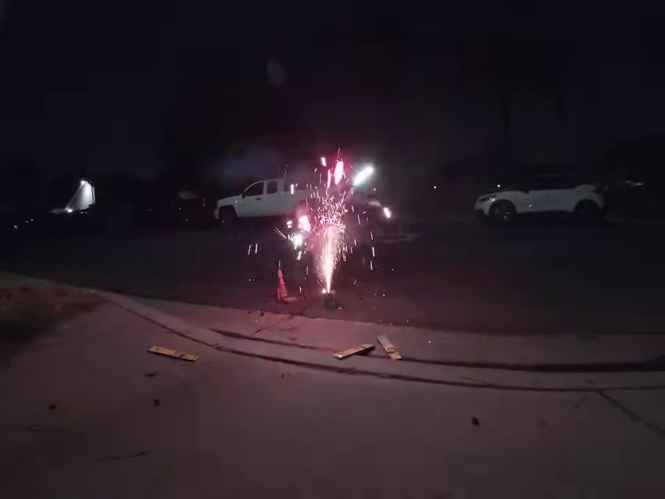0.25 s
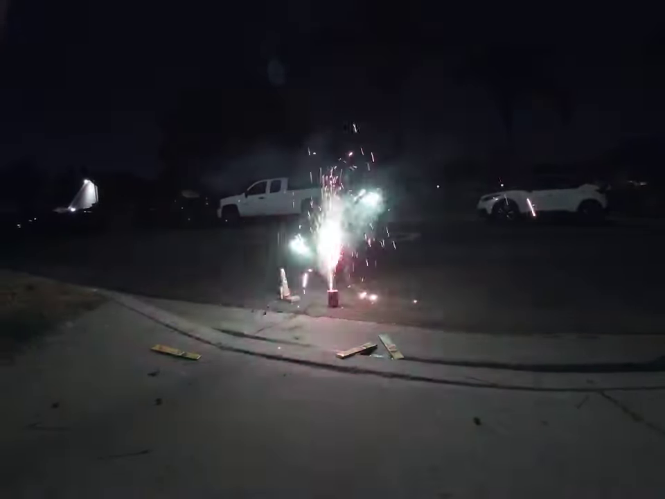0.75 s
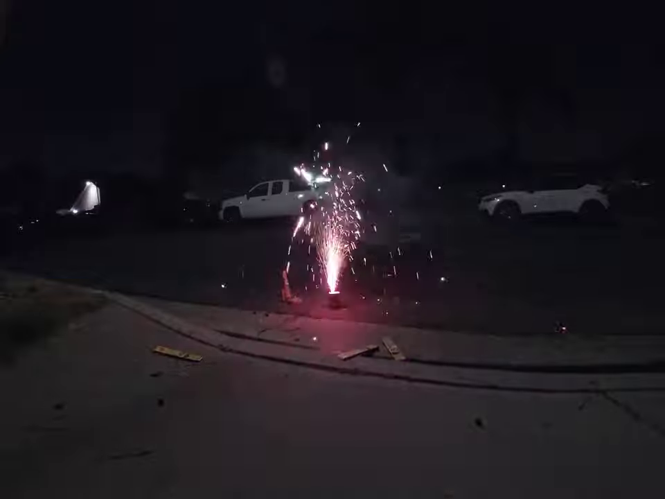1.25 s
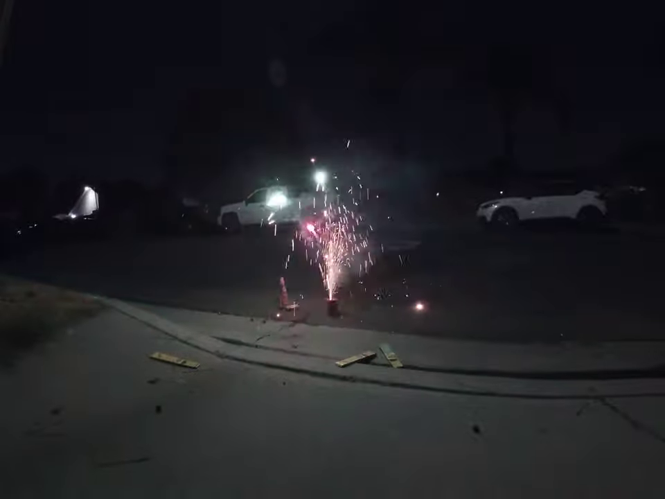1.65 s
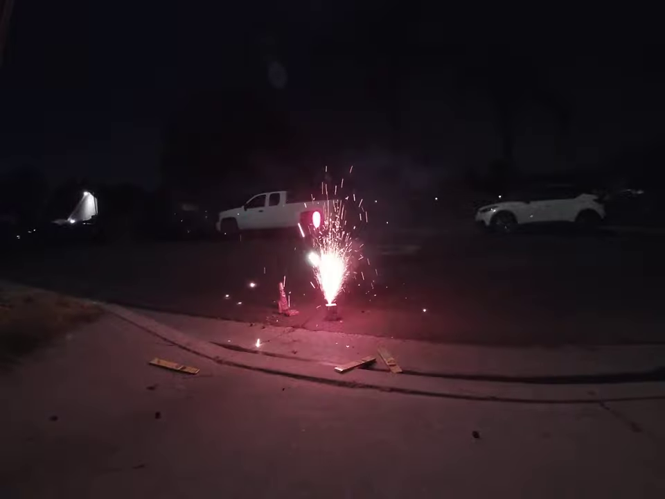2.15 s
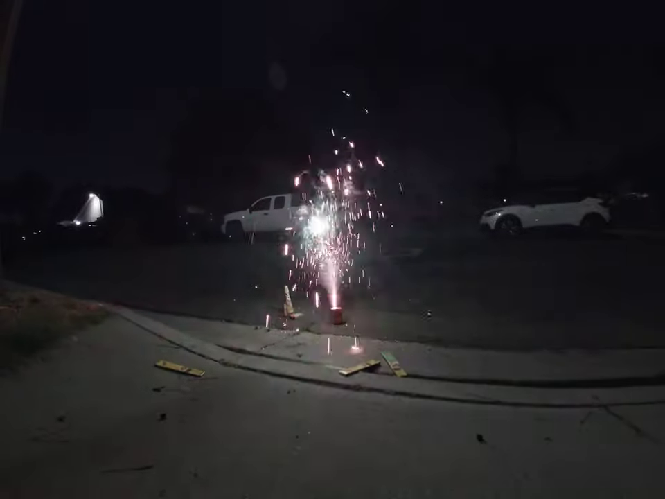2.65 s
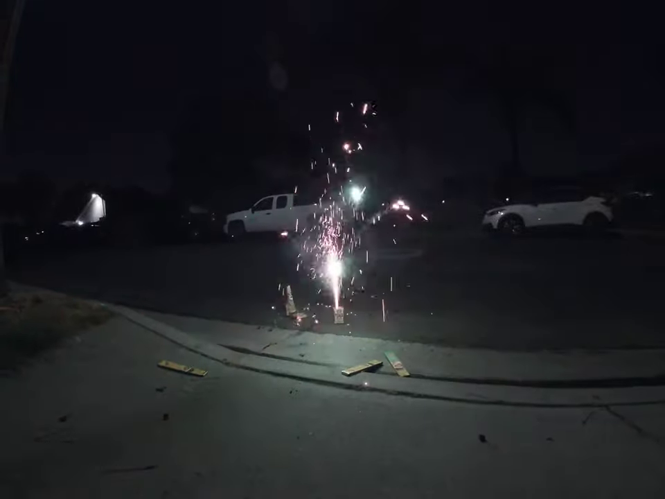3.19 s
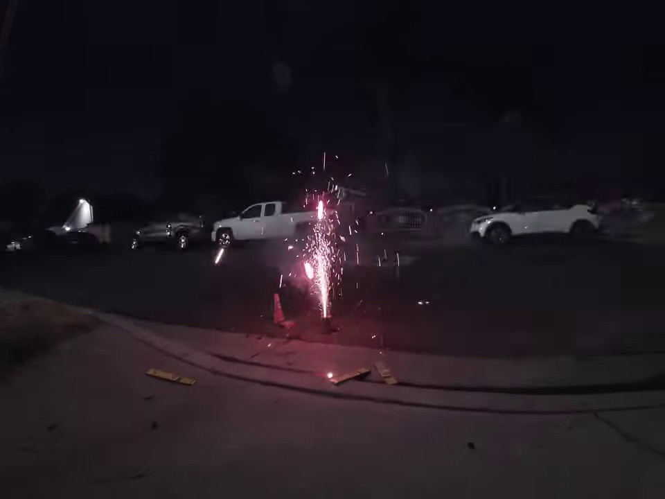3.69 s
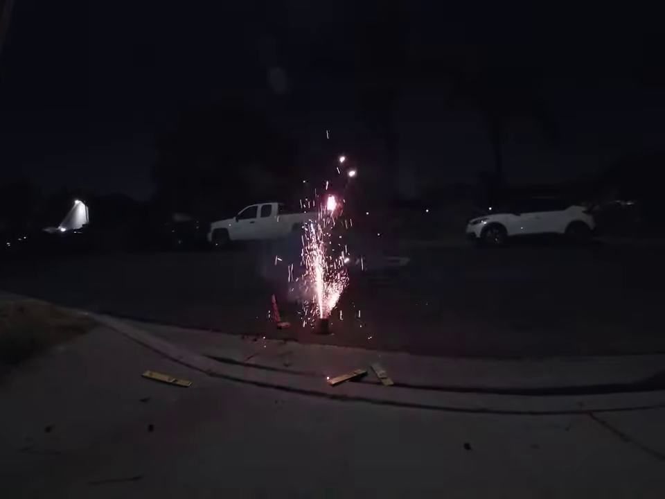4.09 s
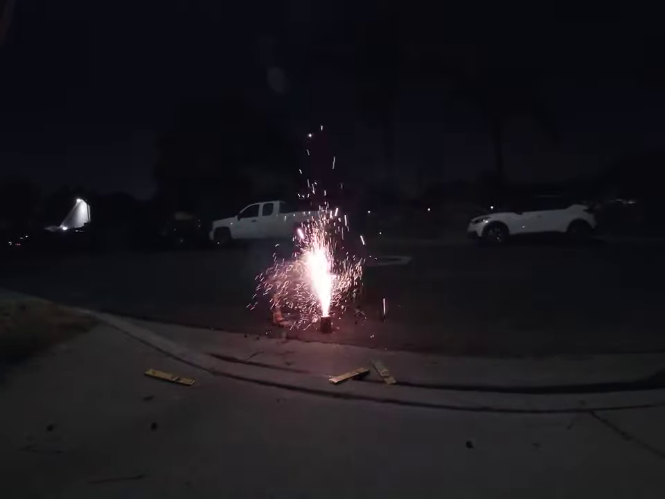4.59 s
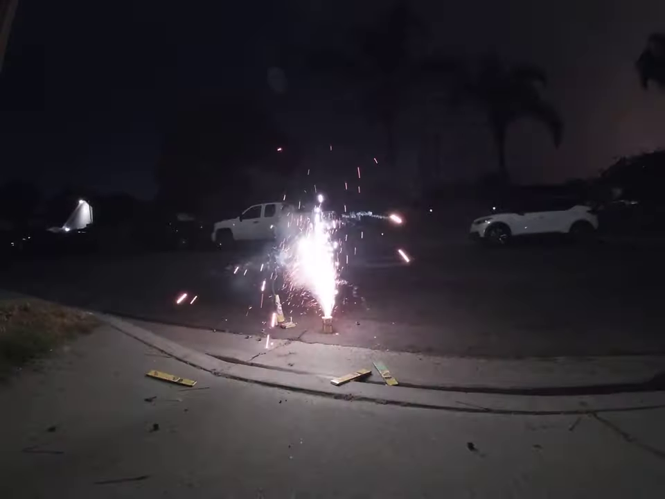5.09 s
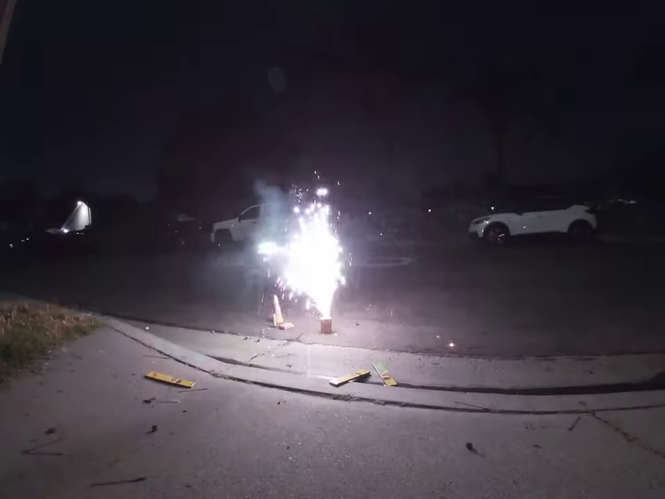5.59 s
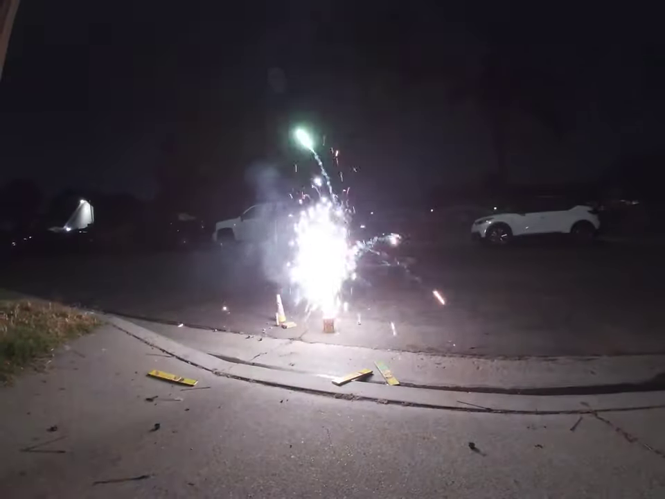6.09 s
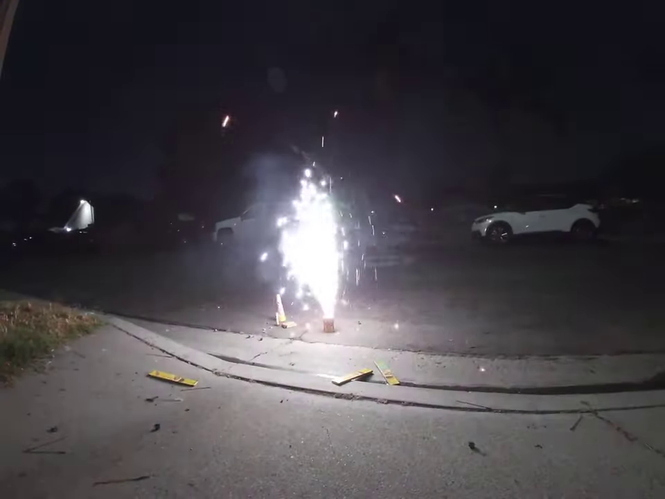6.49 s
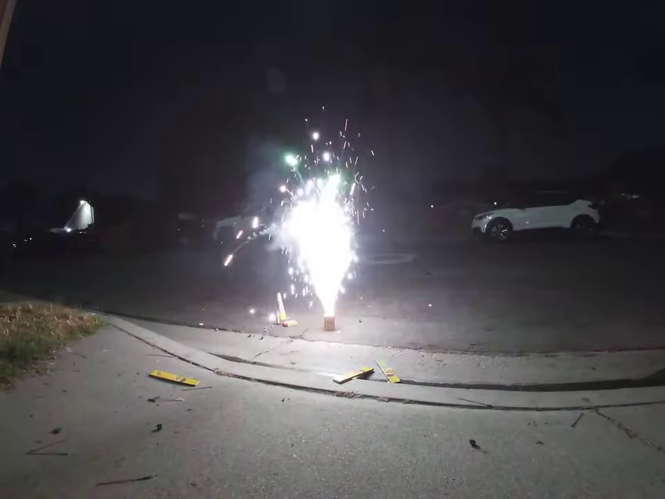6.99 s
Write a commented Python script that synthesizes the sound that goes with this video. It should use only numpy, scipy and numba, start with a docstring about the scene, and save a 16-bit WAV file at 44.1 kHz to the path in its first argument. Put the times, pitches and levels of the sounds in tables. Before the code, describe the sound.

Outdoors on a night street, a small ground fountain hisses and fizzes quietly throughout, sputtering unevenly and brightest near 3 seconds. Over it, firework bursts dominate from the start: dull low thumps in irregular clusters, with sharper cracks around 0.3, 1.6 and 2 seconds, blurred into lumpy rumble and mid-range wash off houses. Activity thins around 2.5 to 2.9, resumes with thumps at 3 to 3.5, then cracks bunch up from 4.2. At 4.6 a very close, hard bang sets the street booming, with slaps and rolling echoes. Bursts ease by 5, and a grainy shower of tiny pops swells at 5.3, fading before 6. Near 6.16 the loudest bang strikes, followed by rapid thuds and cracks until 6.4. Scattered thumps continue as another crackling shower fills in around 7 and lasts nearly to the end. Single microphone, slightly dulled treble, rounded peaks, brief ducking after bangs.

```python
"""Night street: shell bursts and the hiss of a ground fountain are present from the outset.
Far bursts radiate dull low thumps, nearer ones add a crack with scatter; houses return rumble and wash.
Near 4.6 s a very close burst sets the street booming; near 5.3 s filtered random pops form a star shower.
Near 6.2 s another close burst follows, and near 7 s a second shower; the fountain is filtered noise."""
import sys
import numpy as np
from scipy import signal
from scipy.fft import rfft, irfft
from scipy.io import wavfile
from scipy.ndimage import uniform_filter1d
from numba import njit

SR = 44100
rng = np.random.default_rng(int(sys.argv[2]) if len(sys.argv) > 2 else 0)


def materialize(psi):
    """Save the field psi as 16-bit PCM at rate SR to the path in sys.argv[1].

    A 1-D psi becomes a single channel; in a 2-D psi each row is a channel.
    """
    bounded = np.clip(np.atleast_2d(psi).T, -1, 1)
    quanta = np.round(bounded * 32767).astype(np.int16)
    wavfile.write(sys.argv[1], SR, quanta)


N = 319725
TIME = np.arange(N) / SR  # s

# Low pressure pulses of the bursts: t/s of the trough, trough level/dB, f/Hz at the trough
THUMPS = [(0.015, -13, 139), (0.087, -7.5, 254), (0.271, -6, 198), (0.285, -9, 148), (0.315, -8, 228),
          (0.355, -14, 170), (0.415, -5, 240), (0.498, -15.5, 214), (0.791, -3.5, 237), (0.848, -8.5, 223),
          (0.878, -12.5, 252), (1.094, -10, 149), (1.186, -4, 262), (1.24, -8, 222), (1.315, -7, 273),
          (1.497, -9.5, 198), (1.608, -3, 223), (1.682, -13, 210), (1.73, -6.5, 239), (1.747, -15, 200),
          (1.774, -8, 138), (1.946, -2.5, 236), (1.981, -3.5, 157), (2.054, -10, 235), (2.071, -4.5, 230),
          (2.087, -13, 200), (2.254, -14, 123), (2.269, -10, 255), (2.452, -8.5, 156), (2.961, -10.5, 249),
          (3.008, -7, 190), (3.046, -9.5, 224), (3.093, -9.5, 200), (3.124, -7.5, 198), (3.148, -28, 127),
          (3.233, -2, 226), (3.31, -8.5, 247), (3.356, -5.5, 228), (3.383, -9, 173), (3.49, -9.5, 195),
          (3.556, -12, 227), (3.975, -11, 203), (4.013, -10, 163), (4.124, -5.5, 159), (4.152, -8, 193),
          (4.229, -1.5, 230), (4.259, -8.5, 197), (4.288, -3.5, 197), (4.355, -5.5, 244),
          (4.406, -6.5, 184), (4.5, -5, 219), (4.6054, 1.5, 172), (4.6488, -1.5, 205), (4.683, -4, 183),
          (4.712, -18, 162), (4.727, -8, 190), (4.741, -15, 196), (4.762, -15, 201), (4.782, -24, 149),
          (4.819, -10, 151), (5.486, -11, 153), (5.71, -6.5, 191), (6.1625, 0.5, 192), (6.221, -8, 252),
          (6.253, -6, 240), (6.265, -11, 166), (6.278, -10, 215), (6.3, -4.5, 294), (6.322, -8.5, 227),
          (6.341, -6, 208), (6.358, -5.5, 190), (6.371, -8.5, 227), (6.386, -14, 170), (6.413, -12, 213),
          (6.651, -10, 89), (6.782, -5, 200), (6.883, -5.5, 202), (6.927, -9, 248), (7.051, -9, 169),
          (7.164, -3, 198), (7.234, -10.5, 151)]
# Sharp fronts of nearer bursts and their wall slaps: onset t/s, body level/dB, body f/Hz,
# edge level/dB relative to the body
CRACKS = [(0.082, -20, 640, -15), (0.267, -17, 590, -18), (0.289, -26, 950, -12), (0.3102, -8, 860, -11.5),
          (0.334, -42, 700, -12), (0.373, -41, 696, -7), (0.651, -33, 870, -7), (1.237, -29, 650, -12),
          (1.511, -28, 703, -9), (1.602, -15, 865, -12), (1.638, -14, 1060, -14), (1.65, -19, 970, -12),
          (1.677, -21, 980, -17), (1.723, -32, 710, -11), (1.94, -15.5, 706, -19), (1.976, -12, 680, -13),
          (1.999, -26, 616, -17), (2.012, -29, 686, -5), (2.028, -40, 620, -11), (2.153, -56, 1430, -15),
          (2.248, -40, 715, -9), (2.266, -17, 570, -26), (2.308, -39, 1560, -11), (2.457, -24, 1350, -19),
          (2.587, -40, 786, 8), (3.227, -23.5, 993, -6), (3.264, -15, 1450, -16), (3.298, -31, 714, -6),
          (3.782, -30, 1100, -14), (3.823, -43, 703, -2), (3.869, -38, 727, -10), (3.963, -17, 820, -18),
          (4.022, -18, 1640, -27), (4.222, -14, 840, -13), (4.261, -12, 1170, -28), (4.28, -8.5, 700, -17),
          (4.297, -24, 703, -15), (4.309, -17, 790, -16), (4.33, -23, 750, -15), (4.382, -35, 800, 0),
          (4.423, -22, 910, -20), (4.5993, -0.5, 600, -1), (4.6168, -24, 1500, -6), (4.642, -9, 570, -15),
          (4.677, -32, 800, -17), (4.709, -36, 596, -14), (4.803, -40, 1010, -3), (4.824, -50, 1650, -3),
          (5.873, -54, 900, -2), (6.1568, 3, 720, -10), (6.215, -20, 800, -12), (6.226, -40, 980, -9),
          (6.248, -11, 1030, -14), (6.292, -18.5, 890, -13), (6.3, -19.5, 895, -11), (6.338, -32, 547, -13),
          (6.353, -35, 550, -12), (6.413, -45, 524, -24), (6.876, -19, 705, -13), (7.049, -38, 982, -5)]
# Steady part of the blurred far bursts: t/s, rumble level/dB, house wash level/dB
FAR_BURSTS = [(0.0, -22, -31), (0.3, -23.5, -32.5), (0.6, -24.5, -32.5), (1.07, -23, -31),
              (1.35, -22, -28.5), (1.8, -23.5, -33), (2.2, -22, -36), (2.45, -25.5, -32), (2.7, -23.5, -31),
              (2.9, -22.5, -26.5), (3.4, -20, -29.5), (3.85, -25.5, -32), (4.1, -24.5, -28.5),
              (4.55, -22, -32), (4.72, -23, -26.5), (4.9, -22, -39), (5.25, -28.5, -61), (5.5, -24, -39.5),
              (5.95, -21.5, -32), (6.19, -24.5, -30), (6.36, -40, -27), (6.5, -24.5, -34.5),
              (6.7, -22, -35), (7, -29, -28.5), (7.25, -41, -28)]
# Spectrum of the rumble: f/Hz, relative gain/dB
RUMBLE_COLOUR = [(35, -20.5), (60, -1.5), (110, 3.5), (200, 0.5), (280, -5), (360, -18.5), (600, -58),
                 (4000, -120)]
# Spectrum of the wash off the houses: f/Hz, relative gain/dB
WASH_COLOUR = [(250, 5.5), (380, -1.5), (470, -1), (560, 0.5), (650, 0), (760, 0), (900, -2.5), (1200, -13),
               (2500, -46.5), (9000, -110)]
# Spectrum of the brighter wash: f/Hz, relative gain/dB
BRIGHT_COLOUR = [(500, -9), (900, 9), (1300, 1), (2000, -5.5), (3000, -9.5), (6000, -46.5), (12000, -81)]
# Bright sizzle that swells now and then: t/s at the top, level/dB, rise/(dB/s)
GLARE = [(4.27, -49, 81), (4.63, -46.5, 200), (4.74, -52, 77), (6.09, -49.5, 17), (6.24, -52, 210),
         (6.33, -48.5, 80)]
# Spectrum of the sizzle: f/Hz, relative gain/dB
GLARE_COLOUR = [(1500, -15), (3500, -6), (4800, 3), (6000, 3.5), (7000, -0.5), (8200, -5), (9500, -8),
                (11000, -9.5), (12500, -33), (15500, -63)]
# Spectrum of the street boom: f/Hz, relative gain/dB
STREET_COLOUR = [(200, -18), (330, -3), (480, 0), (620, -4), (800, -14), (1500, -40), (6000, -90)]
# Burning jet of the fountain: t/s, level/dB before its level-dependent brightening
JET = [(0.0, -39.5), (0.1, -42), (0.2, -37.5), (0.35, -42), (0.6, -41), (0.9, -40.5), (1.16, -39.5),
       (1.52, -37), (1.69, -44.5), (2.12, -44.5), (2.35, -40.5), (2.5, -42.5), (2.7, -37.5), (2.92, -33.5),
       (3.04, -35.5), (3.14, -34.5), (3.35, -38), (3.7, -38.5), (4.02, -37.5), (4.16, -39), (4.59, -42),
       (4.9, -52.5), (5.4, -43.5), (5.8, -45), (6.1, -45.5), (6.414, -50.5), (6.75, -47.5), (7.0, -40.5),
       (7.25, -43)]
# Spectrum of the jet: f/Hz, relative gain/dB
JET_COLOUR = [(400, -7.5), (1000, -3.5), (2000, -3.5), (3000, 5), (4500, 1), (5600, -10), (7500, -9.5),
              (8800, -15), (10000, -23), (12500, -24), (14000, -30), (15600, -48)]
# Kerb reflections of the jet's treble: delay/ms, gain/1
KERB_PATHS = [(1.85, -.38), (1.45, .25)]
# Star showers: t/s when full, level/dB, hold/s, burn/s, lower wash/dB relative to that level
SHOWERS = [(5.3, -32, 0.13, 0.38, -2), (6.954, -31.5, 0.21, 0.4, 1)]
# Spectrum of the stars: f/Hz, relative gain/dB
STAR_COLOUR = [(200, -23), (500, -4.5), (1000, 6), (1300, 3), (2000, 0.5), (2700, -0.5), (3200, -5.5),
               (4000, -11), (5800, -11), (7500, -20.5), (9500, -25.5), (12000, -31), (13500, -34),
               (15500, -45)]

# Echoes off the houses, each row: first return t/s, swell time/s, top level/dB after a -10 dB burst
# Rumble returned by thumps
THUMP_RUMBLE_RETURN = (0.037, 0.018, -28.5)
# Wash returned by thumps
THUMP_WASH_RETURN = (0.036, 0.0096, -60.5)
# Rumble returned by cracks
CRACK_RUMBLE_RETURN = (0.12, 0.023, -28.5)
# Wash returned by cracks
CRACK_WASH_RETURN = (0.12, 0.0097, -34.5)
# Brighter wash returned by cracks
CRACK_BRIGHT_RETURN = (0.053, 0.014, -37)
# Boom returned by the street
STREET_RETURN = (0.045, 0.06, -40)

NEAR_FROM_DB, NEAR_FULL_DB = -20, 1  # a crack keeps more of its steep edge the louder it is
EDGE_HZ, EDGE_DAMP = 2300, 2.8  # steep edge of a near burst: pitch, decay exponent per cycle
SNAP_DB = -12  # shock front at full nearness, relative to the body
BLUR_DB, BLUR_T60_S = 6.5, 0.03  # smeared edge of far bursts: relative to the edge level, decay
FAR_EDGE_HZ, SLAP_EDGE_HZ = 3880, 6500  # top of the smeared edge: ordinary cracks, slaps after the nearest
SLAPS_LAST_S = .25
SCATTER_DB, LINGER_DB = -6, -11  # scatter and low echoes relative to a -17 dB crack
DRIER_DB_PER_DB = 0.8136  # a louder crack is nearer: its scatter grows less than it does
BRIGHT_DB, BRIGHT_GROWTH = -6, 0.48  # steady bright wash below the wash; echo dB per burst dB
GLARE_FALL_DB_S = 71
STARS_RISE_DB_S, STARS_SAG_DB_S, STARS_FALL_DB_S = 71, 17.5, 111  # the fall adds to the sag
LIMIT_DB, LIMIT_RATIO, LIMIT_RELEASE_S = -5, 2.1, 0.012
TOP_HZ = 15600


def thumps(turns=0.64, chirp=0.27, lead=0.015, knock_db=-17):
    """Dispersion with distance: a push, a deep trough and a slower rebound; the higher part runs ahead."""
    out = np.zeros(N)
    for s, db, hz in THUMPS:
        c = np.arange(-2, 2, hz / SR)  # time in cycles around the trough
        envelope = np.exp(-((c + lead) / turns) ** 2)
        shape = -np.cos(2 * np.pi * (c - chirp * c ** 2 / 2)) * envelope
        knock = np.cos(2 * np.pi * 2.16 * (c + .5)) * np.exp(-((c + .5) / 0.42) ** 2)
        add(out, s - 2 / hz, undb(db) * (shape + undb(knock_db) * knock))
    return out


def cracks(turns=0.29, low_t60=0.15, snap_hz=6500):
    """Air absorption and scattering: one rounded pressure cycle with a steep or smeared edge, then echoes."""
    out = np.zeros(N)
    t = np.arange(int(.2 * SR)) / SR
    noises = rng.standard_normal((len(CRACKS), len(t)))
    for (s, db, hz, edge_db), noise in zip(CRACKS, noises):
        near = np.clip((db - NEAR_FROM_DB) / (NEAR_FULL_DB - NEAR_FROM_DB), 0, 1)
        c = hz * t - .8  # cycles
        body = -np.sin(2 * np.pi * c) * np.exp(-(c / turns) ** 2)
        late = np.maximum(t - .52 / hz, 0)  # the edge rides on the first push
        edge = 2 * np.sin(2 * np.pi * EDGE_HZ * late) * np.exp(-EDGE_DAMP * EDGE_HZ * late)
        snap = np.sin(2 * np.pi * snap_hz * late) * np.exp(-1.8 * snap_hz * late)

        is_slap = any(0 < s - row[0] < SLAPS_LAST_S for row in nearest())
        top_hz = SLAP_EDGE_HZ if is_slap else FAR_EDGE_HZ
        dulled = signal.lfilter(*signal.butter(1, 2600, fs=SR), noise[::-1])
        blur = unit(band(dulled, 3, 800, top_hz))
        blur *= undb(BLUR_DB - 60 * t / BLUR_T60_S) * (1 - np.exp(-t / .0007))
        front = undb(edge_db) * (near * edge + (1 - near) * blur)
        front += near ** 2 * undb(SNAP_DB) * snap

        rattle = unit(band(noise, 2, 0.5 * hz, 1.61 * hz))
        rattle *= undb(SCATTER_DB - 60 * t / .026)  # falls 60 dB in 26 ms
        # the lower echoes stay longer
        linger = unit(band(noise, 2, 330, 680)) * undb(LINGER_DB - 60 * t / low_t60)
        onset = 1 - np.exp(-t / 0.00068)
        wash = undb(-DRIER_DB_PER_DB * (db + 17.0)) * (rattle + linger) * onset
        add(out, s, undb(db) * (body + front + wash))
    return out


def nearest():
    """Proximity judged by level: the bursts close enough to set the whole street ringing."""
    return [row for row in CRACKS if row[1] > -3]


def street():
    """Reverberation: the nearest bursts roll down the street as one smooth boom."""
    boom = unit(colour(rng.standard_normal(N), STREET_COLOUR))
    return boom * returns(nearest(), STREET_RETURN)


def jet():
    """Turbulent noise: gas hiss with fizzing sparks; the kerb reflects only its treble."""
    hiss = rng.standard_normal(N) * undb(walk(25)) + .25 * clicks(2500, 4)
    hiss *= undb(.9 * walk(18))  # the flame sputters
    treble = highpass(hiss, 4, 4500)
    kerb = sum(gain * np.roll(treble, int(ms * SR / 1000)) for ms, gain in KERB_PATHS)
    sound = unit(colour(hiss + kerb, JET_COLOUR))
    db = curve(JET)
    # a fiercer jet is also brighter
    top = (undb(0.16 * (db + 39.5)) - 1) * highpass(sound, 2, 6500)
    air = (undb(0.31 * (db + 34.5)) - 1) * highpass(sound, 4, 9500)
    return (sound + top + air) * undb(db)


def shower():
    """Superposed impulses: small stars pop at random high up, smeared by diffuse echoes."""
    pops = clicks(2500, 8.3)
    level, _ = stars()
    return unit(colour(pops + 2.1 * tail(pops, 0.083), STAR_COLOUR)) * level


def stars():
    """Exponential growth and decay: summed levels of the showers and of their lower wash."""
    level, wash_level = 0, 0
    for s, db, hold_s, burn_s, wash_db in SHOWERS:
        rise = STARS_RISE_DB_S * np.maximum(s - TIME, 0)  # it spreads
        sag = STARS_SAG_DB_S * np.maximum(TIME - s - hold_s, 0)  # it thins
        fall = STARS_FALL_DB_S * np.maximum(TIME - s - burn_s, 0)  # it goes out
        gain = undb(db - rise - sag - fall)
        level = level + gain
        wash_level = wash_level + gain * undb(wash_db)
    return level, wash_level


def glare():
    """Band-shaped noise: a bright sizzle that swells and falls exponentially."""
    sizzle = unit(colour(rng.standard_normal(N), GLARE_COLOUR)) * undb(walk(29.82))
    level = 0
    for s, db, rise_db_s in GLARE:
        drop = np.maximum(rise_db_s * (s - TIME), GLARE_FALL_DB_S * (TIME - s))
        level = level + undb(db - drop)
    return sizzle * level


def roll():
    """Multiple reflection: far bursts blur into a lumpy rumble; nearer walls return a brighter wash."""
    slaps = clicks(400, 2.6)
    slaps = (.4 * slaps + tail(slaps, .1)) * undb(1.2 * walk(14))
    return rumble() + house_wash(slaps) + bright_wash(slaps)


def rumble():
    """Diffuse low reflection: random blasts and their echoes, swelling after each burst."""
    blasts = clicks(300, 3.63)
    low = unit(colour(blasts + 0.5 * tail(blasts, 0.68), RUMBLE_COLOUR))
    echoes = np.hypot(returns(THUMPS, THUMP_RUMBLE_RETURN), returns(CRACKS, CRACK_RUMBLE_RETURN))
    return low * np.hypot(undb(curve(FAR_BURSTS)), echoes)


def house_wash(slaps):
    """Power addition of mid-range reflections: steady wash with star wash, and the echo of each burst."""
    _, star_wash = stars()
    steady = undb(curve(FAR_BURSTS, column=2))
    echoes = np.hypot(returns(THUMPS, THUMP_WASH_RETURN), returns(CRACKS, CRACK_WASH_RETURN))
    return unit(colour(slaps, WASH_COLOUR)) * np.hypot(steady + star_wash, echoes)


def bright_wash(slaps):
    """Nearer-wall reflection: bright echoes that grow more slowly than the burst that makes them."""
    steady = undb(curve(FAR_BURSTS, column=2) + BRIGHT_DB)
    echoes = returns(CRACKS, CRACK_BRIGHT_RETURN, BRIGHT_GROWTH)
    return unit(colour(slaps, BRIGHT_COLOUR)) * np.hypot(steady, echoes)


def returns(bursts, how, growth=1):
    """Energy summation: the echo of every burst comes back late, swells and dies; powers add."""
    late_s, swell_s, db = how
    coarse = TIME[::64]
    starts = np.array([row[:1] for row in bursts])
    age = np.maximum(coarse - late_s - starts, 0) / swell_s
    top_power = undb([db + growth * (row[1] + 10) for row in bursts]) ** 2
    power = top_power @ (age * np.exp(1 - age))
    return np.interp(TIME, coarse, np.sqrt(power))


def tail(x, t60):
    """Diffuse reverberation: noise that follows the power of x and decays 60 dB in t60 seconds."""
    keep = undb(-120 / (t60 * SR))  # power kept per sample
    power = signal.lfilter([1], [1, -keep], x ** 2)
    return unit(rng.standard_normal(N) * np.sqrt(power))


def clicks(rate, spread_db):
    """Poisson-like impulses: random clicks of either sign and uneven size, rate per second."""
    hit = rng.random(N) < rate / SR
    sign = np.sign(rng.standard_normal(N))
    return unit(hit * sign * undb(spread_db * rng.standard_normal(N)))


def walk(rate):
    """Smoothed random fluctuation: levels held 1 / rate s and averaged twice; RMS 1."""
    k = int(SR / rate)
    steps = np.repeat(rng.standard_normal(N // k + 1), k)
    return unit(uniform_filter1d(uniform_filter1d(steps, k), k)[:N])


def colour(x, points):
    """Minimum-phase filtering: a causal filter through (f/Hz, gain/dB) points, from the folded cepstrum."""
    hz, db = np.transpose(points)
    grid = np.fft.rfftfreq(8192, 1 / SR)
    log_gain = np.interp(np.log(grid + 1), np.log(hz), db) * np.log(10) / 20
    cep = irfft(log_gain)
    cep[1:4096] *= 2
    cep[4097:] = 0
    response = irfft(np.exp(rfft(cep)))[:4096]
    return signal.fftconvolve(x, response)[:len(x)]


def band(x, order, low_hz, high_hz):
    """Band limitation: a Butterworth band-pass."""
    return signal.lfilter(*signal.butter(order, [low_hz, high_hz], "band", fs=SR), x)


def highpass(x, order, hz):
    """Low-frequency attenuation: a Butterworth high-pass."""
    return signal.sosfilt(signal.butter(order, hz, "high", fs=SR, output="sos"), x)


def undb(db):
    """Logarithmic level: decibels to amplitude ratio."""
    return 10 ** (np.asarray(db) / 20)


def unit(x):
    """Mean-square normalisation: scale to RMS 1."""
    return x / np.sqrt(np.mean(x ** 2))


def curve(table, column=1):
    """Linear interpolation: one column of a table along time."""
    rows = np.array(table)
    return np.interp(TIME, rows[:, 0], rows[:, column])


def add(out, at_s, grain):
    """Superposition: mix a grain into the track."""
    i = int(at_s * SR)
    out[i:i + len(grain)] += grain[:N - i]


@njit
def follow(x, keep):
    """Peak detection: the envelope jumps up at once and sinks slowly."""
    y, e = np.empty(len(x)), 1e-9
    for i in range(len(x)):
        e = max(abs(x[i]), e * keep)
        y[i] = e
    return y


def scene():
    """Linear superposition of all sources and reflections, as one channel."""
    return (thumps() + cracks() + street() + jet() + shower() + glare() + roll())[None]


def record(dry):
    """Transduction: band-limited microphone, gain control ducking after loud bangs, rounded peaks."""
    x = highpass(dry, 1, 38)
    peak = follow(x[0], np.exp(-1 / (LIMIT_RELEASE_S * SR)))
    gain = np.minimum(undb(LIMIT_DB) / peak, 1) ** (1 - 1 / max(LIMIT_RATIO, 1))
    x = x * (1 - signal.lfilter([.004], [1, -.996], 1 - gain))  # the gain follows some ms late
    rounded = np.tanh(1.09 * x) / 1.07
    x = signal.sosfilt(signal.butter(2, 9500, fs=SR, output="sos"), rounded)
    return signal.sosfilt(signal.ellip(10, .2, 80, TOP_HZ, fs=SR, output="sos"), x)


dry = scene()
out = record(dry)
materialize(out)
```